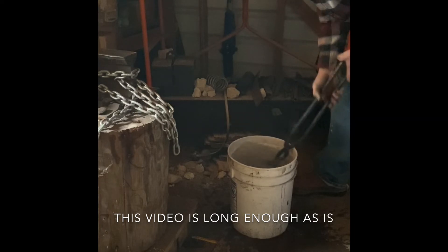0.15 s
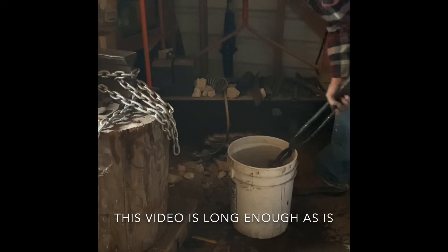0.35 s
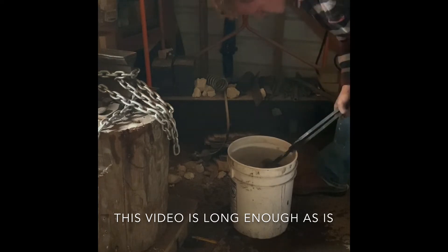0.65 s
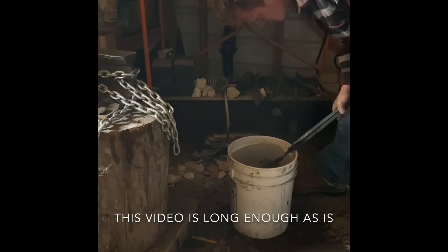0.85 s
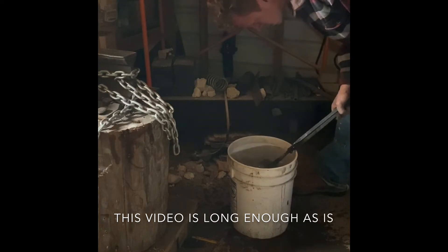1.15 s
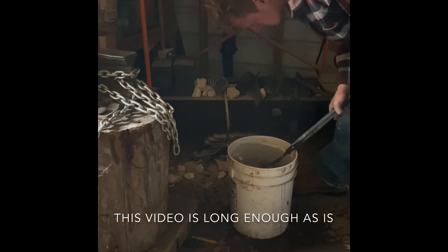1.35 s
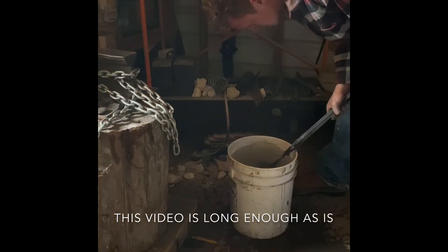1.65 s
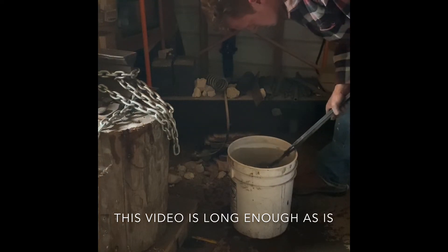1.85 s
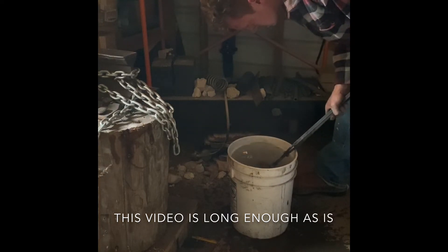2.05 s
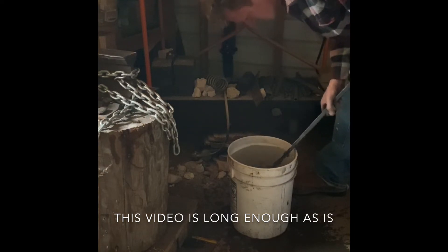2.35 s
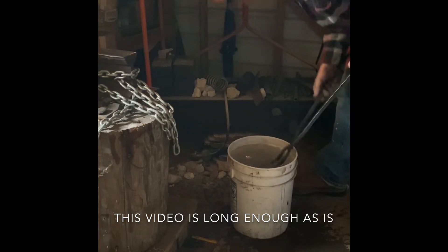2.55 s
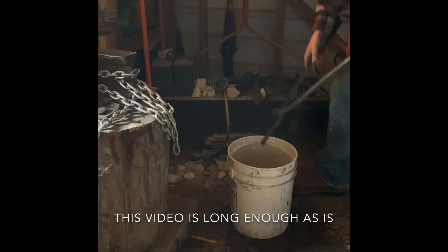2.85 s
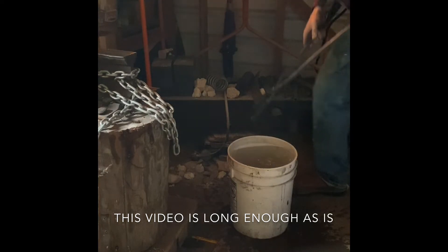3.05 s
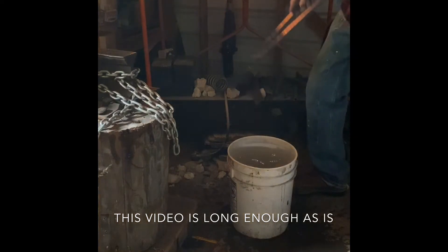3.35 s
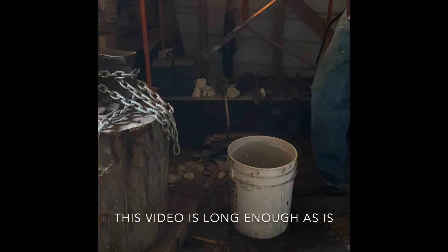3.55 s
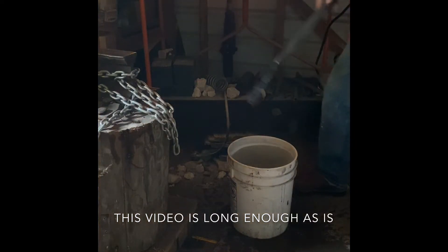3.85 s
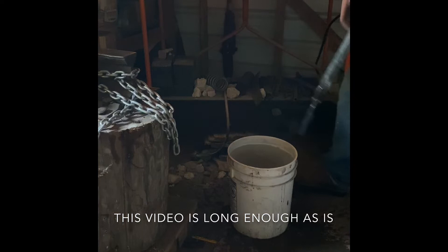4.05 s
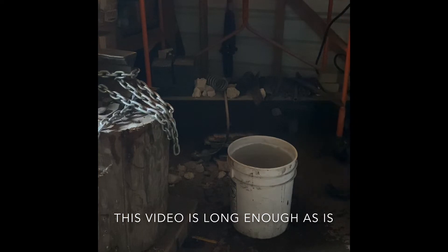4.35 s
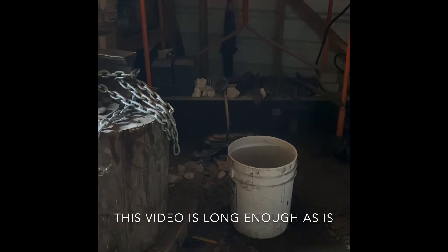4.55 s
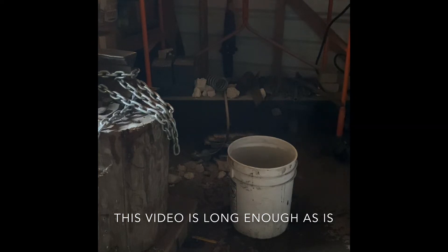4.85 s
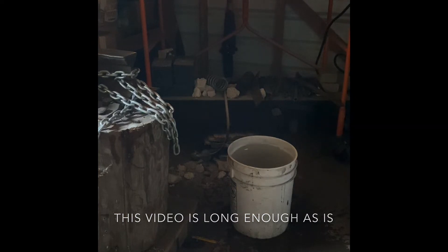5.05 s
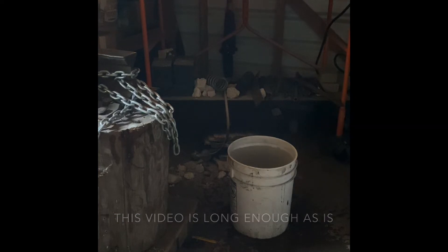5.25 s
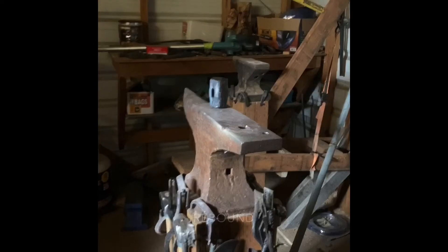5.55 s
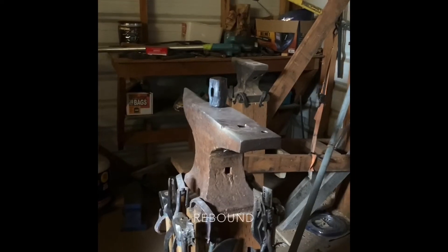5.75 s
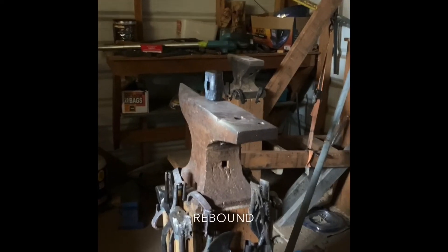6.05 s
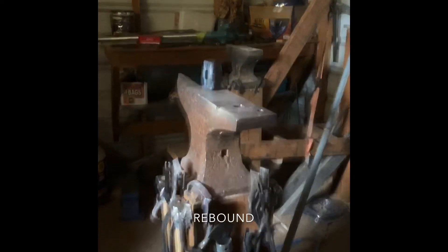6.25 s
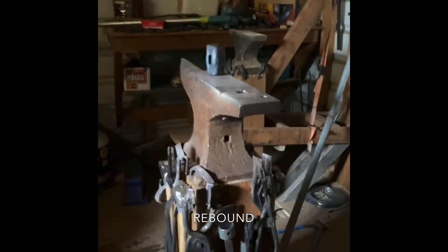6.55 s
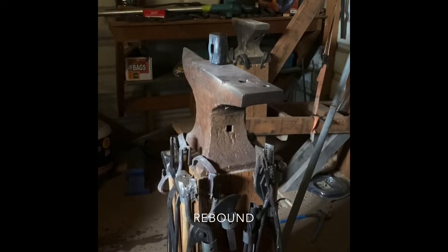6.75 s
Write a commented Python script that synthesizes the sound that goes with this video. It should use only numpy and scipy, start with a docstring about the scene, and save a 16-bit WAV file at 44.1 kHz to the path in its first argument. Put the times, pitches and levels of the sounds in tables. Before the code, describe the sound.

A forge burns with a steady, low, fluttering roar and a thin hiss in a modest, slightly echoing workshop. At about 0.15 s steel lightly taps a water-filled plastic bucket, with a faint dull step. The roar then dominates, with small low bubble blips near 1.35 and 2.4 s and a very faint sizzle around 2.5 s. At 2.65 s comes a loud, boomy bucket knock, followed until 3.2 s by rattles, dull bumps, watery plops, drips and small splashes. A heavy footfall lands at 3.55 s, a drip at 3.6 s, and tongs clink brightly at 3.66 s. A faint step follows at 4.55 s and a low blip at 4.8 s. At 5.44 s the roar stops short. Quiet air and low handling rumble remain, with a bump and scuffs at 5.57 s, a stronger thump at 6.23 s, and ticks, rubs and soft thumps from 6.4 to 6.8 s, very close.

```python
"""In a smithy, a forge roars while steel held in tongs is quenched in a plastic bucket of water.
The steel knocks the bucket, rattles and sloshes as the tongs come out; a footfall and a clink follow.
Then the roar stops short, leaving the quiet shop and soft bumps and scuffs close to the microphone.
Roar, steam, friction and water are shaped noise; the bucket, tongs, floor and case ring as dying modes,
blips are sines of rising pitch; thumps are damped low swings, and walls prolong the distant blows."""
import sys
import numpy as np
from scipy import signal
from scipy.fft import rfft, irfft
from scipy.io import wavfile

SR = 44100
rng = np.random.default_rng(int(sys.argv[2]) if len(sys.argv) > 2 else 0)


def persist_wave(psi):
    """Save psi, clipped to +-1, as 16-bit WAV."""
    counts = np.round(np.clip(psi, -1, 1) * 32767).astype(np.int16)
    wavfile.write(sys.argv[1], SR, np.atleast_2d(counts).T)


N = 303828
TIME, HZ = np.arange(N) / SR, np.fft.rfftfreq(N, 1 / SR)
HIT_SIZE = 32768  # samples in one blow
AGE = np.arange(HIT_SIZE) / SR  # seconds since the blow

# Spectrum of the flame. Each row: frequency in Hz, relative density in dB per Hz.
FORGE_COLOUR = [(20, -31), (50, -2.5), (140, -6), (330, 0), (560, -2), (850, -12.5), (1500, -18),
                (2200, -21), (2800, -16), (3700, -30), (5000, -30), (7500, -43.5), (11500, -33),
                (15000, -43.5)]
# Resonances and hollows of forge and room. Each row: frequency in Hz, width in Hz, lift in dB.
FORGE_PEAKS = [(94.5, 54, -2), (147, 14, 5.5), (226.2, 19, -7), (261.6, 21, 5.5), (331, 29, -3.5),
               (379.3, 22, 7.5), (388.7, 23, 6), (429, 50, -6.5), (646.4, 70, 9.5), (720, 21, 7),
               (754, 18, -2.5), (870, 26, -5), (958, 190, 6), (1045, 23, 3.5), (1200, 120, -3),
               (1190, 36, 2.5), (1337, 33, 6.5), (1633, 44, -9), (1770, 50, 3), (1970, 89, -0.5),
               (2070, 50, 6), (2210, 110, 7), (2420, 63, -2), (2810, 43, 4.5), (3070, 100, -3),
               (4380, 200, -3)]
# Strength of the draught. Each row: time in seconds, change of the roar in dB.
DRAUGHT = [(0, 0), (2.3, -0.35), (4.1, -0.23), (4.55, 0.5), (4.95, 0.8), (5.12, -1), (5.38, -2)]
FORGE_END, FORGE_FADE = 5.44, 0.034  # s: silence is reached, length of the fade before it
ROAR_DB, HISS_DB = -38.5, -61  # levels at normal draught
FLUTTER_DB = 1.19  # rms flutter of the flame
HISS_FOLLOW = 1.7  # dB of hiss for each dB of draught

# Steel striking the bucket. Each row: start in seconds, level in dB, crack in dB, echo in dB,
# middle near 1.2 kHz in dB, clack near 2.2 kHz in dB, boom in dB.
KNOCKS = [(0.1413, -31.5, -22, -7.5, 7, 0, -2.5), (0.1492, -35.5, -13.5, -1, -2, 5, 1),
          (2.6446, -12, -14, -4.5, -2.5, -1.5, 5), (2.6746, -26.5, -17.5, -9, 0, -3.5, 8.5),
          (2.687, -30, -7.5, -5.5, 4.5, -1, -2), (2.7818, -45, -12, -2.5, 1, -1.5, 9),
          (2.824, -26, -15.5, -1.5, -4.5, -5, -3.5), (2.9829, -25.5, -9.5, -5.5, -3, 0, 1.5),
          (3.0927, -25, -13, 0.5, -1, 2, -1)]
# Spectrum of a knock. Each row: frequency in Hz, relative density in dB per Hz.
KNOCK_COLOUR = [(30, -64.5), (90, -38.5), (125, -27), (240, -37.5), (380, -33), (560, -41), (790, -36),
                (1150, -40.5), (1600, -40.5), (2300, -42), (3300, -48), (5200, -39.5), (9500, -53),
                (15000, -64)]
# Decay of the wash: the treble dies first. Each row: frequency in Hz, time constant in seconds.
KNOCK_FALL = [(200, 0.011), (1000, 0.014), (2500, 0.0059), (8000, 0.0012)]
# Modes of the full bucket. Each row: frequency in Hz, relative level in dB, t60 in seconds.
BUCKET_MODES = [(172.6, 3, 0.38), (200.6, 1.5, 0.55), (281, 7, 0.25), (333, 8, 0.23), (477, 2.5, 0.26),
                (660, 4, 0.24), (734, 5.5, 0.27), (950, -7.5, 0.22), (1035, -5.5, 0.31), (1280, -8.5, 0.17),
                (1455, -2.5, 0.17), (1660, -8, 0.2), (1940, -7, 0.12), (2330, 6, 0.03)]
KNOCK_600_DB = 0  # relative level of a knock near 600 Hz
WASH_GRAIN_DB = 1  # lumpiness of the wash after a knock
BUCKET_RING_DB = -13.5  # the ringing of the wall

# Reverberation of the workshop. Each row: frequency in Hz, t60 in seconds.
ROOM = [(60, 1), (150, 0.65), (400, 0.21), (1500, .36), (5000, 0.26), (14000, .2)]
# Colour of the echo as a blow starts. Each row: frequency in Hz, relative echo in dB.
WET = [(100, -5), (700, -1.5), (2000, -9), (4000, -7), (9000, -20.5)]

# Dull thumps of the bucket, the floor and the microphone's case. Each row: start in seconds, level in dB,
# settled pitch in Hz, swell in seconds, left minus right in dB, lead of the left in radians.
THUMPS = [(0.147, -30, 268, 0.0039, -2, 0), (0.159, -25.5, 131, 0.0037, 0.5, 0),
          (2.651, -15, 318.5, 0.0065, -0.5, 0.07), (2.651, -16.5, 118.7, 0.0074, -1.5, 0),
          (2.792, -32, 186, 0.01, 0, -0.12), (2.869, -28.5, 274, 0.0089, 0, -0.13),
          (2.903, -21.5, 122.5, 0.011, -1.5, 0), (2.948, -22.5, 111, 0.005, 0, 0),
          (2.993, -30, 246, 0.011, 0, 0), (3.024, -24.5, 136, 0.0067, 1, 0),
          (3.094, -29, 134, 0.0059, 1.5, 0), (3.135, -27, 143, 0.0058, 1, -0.12),
          (3.167, -22.5, 162, 0.0062, 0.5, 0), (5.576, -25.5, 476, 0.0024, -3, 1),
          (5.574, -23.5, 127.4, 0.002, -1, 0), (6.2241, -21, 255, 0.0019, -14, .3),
          (6.231, -14, 105.5, 0.0044, -0.5, 0.48), (6.458, -22.5, 88, 0.0081, -4.5, -0.26),
          (6.457, -34, 565, 0.0021, 8, -1.3), (6.4644, -29.5, 477, 0.0053, 2, -0.79),
          (6.63, -29.5, 269, 0.0024, -2, -0.46), (6.639, -26.5, 170, 0.012, 0, -0.04),
          (6.696, -24, 157.3, 0.011, -1.5, -0.096), (6.789, -45, 337, 0.004, -4, 0),
          (6.799, -28.5, 165.5, 0.0064, -0.5, -0.036)]
THUMP_SAG = 0.12  # a thump starts this share above its pitch

# Footfalls on the workshop floor. Each row: start in seconds, level in dB.
STEPS = [(0.2, -39.5), (3.562, -25.5), (4.549, -38)]
# Spectrum of a step. Each row: frequency in Hz, relative density in dB per Hz.
STEP_COLOUR = [(30, -47), (80, -31), (125, -22), (190, -25), (300, -30.5), (600, -73.5), (3000, -62),
               (15000, -73)]
# Modes of the floor. Each row: frequency in Hz, level relative to the step in dB, t60 in seconds.
FLOOR_MODES = [(100, -4.5, 0.3), (135, 4, 0.25), (182.5, 0, 0.2), (367, -11.5, 0.081)]

# Short rounded blips, a few low ones amid the roar.
# Each row: start in seconds, level in dB, starting pitch in Hz.
BLIPS = [(1.354, -33, 667), (2.389, -29.5, 626), (2.686, -24.5, 1480), (2.704, -30, 1840),
         (2.786, -45, 1540), (2.860, -33, 2750), (2.862, -24.5, 1457), (2.879, -27, 2090),
         (2.897, -26.5, 2070), (2.9535, -24.5, 2040), (2.955, -37, 1140), (2.984, -24.5, 2000),
         (2.994, -33, 1480), (3.000, -37, 1750), (3.036, -47, 2100), (3.134, -32.5, 1444),
         (3.613, -32, 2240), (4.789, -34, 700)]
BLIP_CYCLES, BLIP_RISE = 10, 0.019  # decay constant in cycles, share by which the pitch climbs
BLIP_ECHO_DB = -3.5  # room level
DRIP_DB, DRIP_SPREAD_DB = -11, 7  # level relative to the splash, its scatter either way
DRIP_LOW_HZ, DRIP_HIGH_HZ = 1120, 2590  # range of starting pitch
DRIP_WINDOW_S = 0.037  # each splash stirs up small bubbles for this long

# Wet steel sizzling as it comes up and is carried off.
# Each row: middle in seconds, relative level in dB, half length in seconds.
SIZZLES = [(2.485, -53, 0.033), (2.97, -54, 0.07)]
SIZZLE_RING_DB, SIZZLE_RING_HZ = 10, 130  # lift and width of the tongs' modes in the hiss

# Water falling off the steel into the bucket.
# Each row: start in seconds, level in dB, decay in seconds, spray in dB.
SPLASHES = [(2.8602, -25, 0.032, -1.5), (2.889, -30, 0.0066, 3), (2.9497, -28.5, 0.025, 3),
            (3.004, -32, .008, -3), (3.065, -39, 0.018, -12), (3.128, -33.5, .014, -5),
            (3.1429, -31.5, 0.016, -2.5), (3.6105, -40.5, 0.0088, 5.5)]
# Spectrum of a splash. Each row: frequency in Hz, relative density in dB per Hz.
SPLASH_COLOUR = [(50, -58), (150, -39.5), (300, -34.5), (500, -46), (750, -37.5), (1100, -47),
                 (1700, -46.5), (2300, -49), (3300, -54.5), (5200, -56.5), (9500, -65.5), (15000, -74.5)]
# Hollow of the bucket above the water. Each row: frequency in Hz, width in Hz, lift in dB.
SPLASH_RINGS = [(631, 50, 6.5), (1120, 50, 10), (1515, 78, 2), (2060, 190, 8.5)]
SPLASH_GRAIN_DB, SPLASH_ECHO_DB = 3, -3.5  # lumpiness of the water, room level

# The jaws meet and bounce. Each row: start in seconds, relative level in dB.
CLINKS = [(3.6604, 0), (3.667, -5.5), (3.674, -9)]
# Spectrum of the clash. Each row: frequency in Hz, density in dB per Hz before the jaws' resonances.
CLINK_COLOUR = [(50, -120), (3500, -84.5), (4700, -80), (6500, -70.5), (9000, -79), (12000, -83),
                (15500, -84.5)]
# Clusters of close modes in the jaws. Each row: frequency in Hz, width in Hz, lift in dB.
CLINK_RINGS = [(4700, 260, 6.5), (5640, 250, -5), (9450, 300, 6.5), (10900, 400, 0)]
# Modes of the tongs. Each row: frequency in Hz, relative level in dB, t60 in seconds.
TONGS_MODES = [(4080, -6.5, 0.18), (4600, -2, 0.11), (4900, -12, 0.14), (5300, -15, 0.17),
               (5760, -11.5, 0.13), (6330, -18.5, 0.2), (8400, -10, 0.15), (9141, -5, 0.11),
               (10800, -0.5, 0.13), (12760, -22, 0.11), (14550, -22.5, 0.11)]

# Handling rumble. Each row: time in seconds, level in dB.
RUMBLE = [(5.45, -47), (5.62, -45), (6.1, -47), (6.3, -50), (6.55, -47), (6.8, -48.5)]
# Spectrum of that rumble. Each row: frequency in Hz, relative density in dB per Hz.
RUMBLE_COLOUR = [(20, -30), (50, 2), (140, 2), (250, -5), (500, -20), (900, -34), (2000, -56),
                 (15000, -100)]
# Spectrum of the air in the quiet shop. Each row: frequency in Hz, relative density in dB per Hz.
SHOP_COLOUR = [(20, -20), (300, 0), (1000, -4), (3000, -12), (8000, -21), (15000, -27)]
RUMBLE_SWAY_DB, SHOP_DB = -0.45, -77  # unevenness of the rumble, level of the air

# Scuffs and ticks beside the microphone. Each row: start in seconds, level in dB, decay in seconds,
# low ring in dB, high ring in dB (rings relative to the level).
SCUFFS = [(5.559, -58, 0.0089, -2, 1), (5.5723, -50, 0.0009, -6, 11.5), (5.5785, -51, 0.0056, -6, -10),
          (5.595, -50.5, 0.0041, 0, -2), (5.606, -52.5, 0.041, -8, -0.5), (6.2219, -48, 0.0013, -14, -20),
          (6.2317, -46, 0.0021, -19, -14), (6.242, -55.5, 0.0016, -16, -12), (6.3265, -64, 0.0034, -8, -11),
          (6.339, -68, .002, -8, -10), (6.375, -77, .003, 14, 10), (6.387, -66, 0.0016, 20, -1),
          (6.401, -68, 0.0018, 8, 3), (6.4205, -53.5, 0.00086, 10, -2), (6.4474, -46, 0.0023, 7.5, 3),
          (6.4522, -42, 0.0036, -18, 8), (6.465, -43, 0.011, -8, 1), (6.473, -47.5, .005, -6, 3),
          (6.627, -54.5, 0.083, -10.5, -12), (6.663, -62, 0.0076, -5, -5), (6.704, -61, 0.021, -4.5, -11)]
# Spectrum of a scuff before the tilt below. Each row: frequency in Hz, relative density in dB per Hz.
SCUFF_COLOUR = [(40, -21), (200, -15), (500, -22.5), (800, -36), (1100, -35), (1500, -49.5), (2000, -51),
                (2700, -44), (4200, -53.5), (8000, -54), (15000, -75)]
# Tilt of every scuff. Each row: frequency in Hz, lift in dB.
SCUFF_TILT = [(2000, -1.8), (8000, 0.5)]
# Low, then high modes of the case. Each row: frequency in Hz, relative level in dB, t60 in seconds.
CASE_LOW = [(1340, 0, 0.018), (1500, -2, 0.024)]
CASE_HIGH = [(2570, 6, 0.012), (2900, -4.5, 0.017)]
# The same case colouring friction noise. Each row: frequency in Hz, width in Hz, lift in dB.
CASE_RINGS = [(1450, 190, 7), (2540, 320, 5)]
SCUFF_RISE_S, SCUFF_ECHO_DB = 0.00067, -26  # time constant of a fingertip's bite, room level

# A hand sliding on the case. Each row: middle in seconds, relative level in dB, half length in seconds.
RUBS = [(6.398, -62, 0.017), (6.456, -56.5, 0.02), (6.545, -72, 0.038), (6.645, -64, 0.034),
        (6.72, -63, 0.027), (6.79, -74.5, 0.043)]
# Spectrum of a rub. Each row: frequency in Hz, relative density in dB per Hz.
RUB_COLOUR = [(100, -26), (500, -8), (900, -4), (1500, -2.5), (2000, 1.5), (2700, -7), (4500, -9),
              (8000, -14.5), (15000, -21)]
RUB_GRAIN_DB = 2.5  # the skin sticks and slips

# Coherence of the two microphone ports. Each row: frequency in Hz, likeness from 0 to 1.
LIKENESS = [(80, 1), (170, 0.99), (380, 0.71), (600, 0.16), (1000, .45), (2000, 0.75), (2700, 0.77),
            (3800, 1), (5500, .8), (7500, 1), (15000, 0.33)]
# Phase between the ports. Each row: frequency in Hz, lead of the left in radians.
LEAD = [(20, 0), (1400, 0), (2200, .4), (4000, 1.2), (4800, .3), (5800, 1.3), (7200, 3.1), (9900, 6.1),
        (11000, 6.5), (13600, 9.4), (16000, 12.2)]
# Further lead for sounds right beside the microphone. Each row: frequency in Hz, lead in radians.
CLOSE_LEAD = [(150, -0.54), (400, 1.2), (900, 2), (1700, 0.96), (2500, -1.6), (4000, 0.22), (5500, 0.071)]
EDGE_HZ = 15950  # upper band limit

# Overlapping triangular bands that share out the spectrum of a blow.
BANDS = np.geomspace(35, 15500, 22)  # centres in Hz
BIN_HZ = np.fft.rfftfreq(HIT_SIZE, 1 / SR)
SPLIT = np.array([np.interp(np.log(BIN_HZ + 1), np.log(BANDS), row) for row in np.eye(len(BANDS))])
BAND_WIDTH = SPLIT.sum(1) * SR / HIT_SIZE  # Hz
LEVEL_SPAN = .02  # s over which the energy of a burst is reckoned


def amp(db):
    """Logarithmic level: decibels to gain."""
    return 10 ** (np.asarray(db) / 20)


def evened(x):
    """Normalisation of power: scales to rms 1."""
    return x / np.sqrt(np.mean(x ** 2, axis=-1, keepdims=True) + 1e-30)


def read(points, hz):
    """Interpolation of a table on a logarithmic frequency axis."""
    f, value = np.transpose(points)
    return np.interp(np.log(hz + 1), np.log(f + 1), value)


def curves(rows):
    """Linear interpolation in time: each column of a time table, at every sample."""
    s, *columns = np.transpose(rows)
    return [np.interp(TIME, s, c) for c in columns]


def add(mix, s, sound):
    """Superposition: adds a sound to the mix at time s."""
    part = mix[:, max(round(s * SR), 0):][:, :sound.shape[-1]]
    part += sound[..., :part.shape[1]]


def noise(gain):
    """Spectral shaping: two unrelated noises of rms 1 with the given spectrum."""
    return evened(irfft(rfft(rng.standard_normal((2, N))) * gain, N))


def below(hz):
    """Low-pass magnitude response, steep, without phase shift."""
    return 1 / np.sqrt(1 + (HZ / hz) ** 10)


def above(hz):
    """Power-complementary high-pass response."""
    return np.sqrt(1 - below(hz) ** 2)


def wander(size, step):
    """Slow random fluctuation: a smooth line of rms 1 that turns about every step points."""
    smoothing = np.exp(-(np.fft.rfftfreq(size) * step) ** 2)
    return evened(irfft(rfft(rng.standard_normal(size)) * smoothing, size))


def swells(rows):
    """Gaussian envelopes: bell-shaped rises and falls of level."""
    return sum(amp(db) * np.exp(-((TIME - s) / half) ** 2) for s, db, half in rows)


def burst(colour_db, envelope):
    """Energy by band: enveloped noise with the energy of colour_db held for LEVEL_SPAN seconds."""
    bands = irfft(rfft(rng.standard_normal((2, 1, HIT_SIZE))) * SPLIT) * envelope
    gain = amp(colour_db) * np.sqrt(BAND_WIDTH * LEVEL_SPAN * SR / HIT_SIZE)
    return (evened(bands) * gain[:, None]).sum(1)


def in_room(late, decay, wet_db):
    """Reverberation by band: a rise of about one cycle, a quick fall, then the workshop's echo."""
    t = np.maximum(AGE - late, 0)
    echo_start = amp(wet_db + read(WET, BANDS)[:, None])
    echo = echo_start * 1e3 ** (-t / read(ROOM, BANDS)[:, None])
    rise = 1 - np.exp(-t * BANDS[:, None])
    return rise * np.hypot(np.exp(-t / decay), echo)


def at_once(hz):
    """Simultaneous onset: no mode waits."""
    return 0


def ring(modes, lag):
    """Modal decay: dying sines, each starting lag(Hz) seconds after the blow, a quarter turn apart."""
    out = np.zeros((2, HIT_SIZE))
    for hz, db, t60 in modes:
        t = np.maximum(AGE - lag(hz), 0)
        turns = hz * t + rng.random() + np.array([[0], [1 / 4]])
        rise = 1 - np.exp(-2 * hz * t)
        out += amp(db - 60 * t / t60) * rise * np.sin(2 * np.pi * turns)
    return out


def resonant(x, peaks):
    """Parallel resonance: peak filters add to or take from the sound."""
    out = x.copy()
    for hz, width, db in peaks:
        b, a = signal.iirpeak(hz, hz / width, fs=SR)
        out += (amp(db) - 1) * signal.lfilter(b, a, x)
    return out


def forge():
    """Turbulent combustion: flame noise through fixed resonances, with a thin hiss of gas on top."""
    peaks_db = sum(db / (1 + (2 * (HZ - hz) / width) ** 4) for hz, width, db in FORGE_PEAKS)
    comb_db = 2.8 * wander(len(HZ), step=280) * above(790)  # fine ripple left by the walls
    colour = amp(read(FORGE_COLOUR, HZ) + peaks_db + comb_db)
    flame = rfft(noise(colour * below(4000)))
    zones = [below(496), above(497) * below(1584), above(1527)]  # each flutters on its own
    roar = sum(amp(FLUTTER_DB * wander(N, step=2200)) * irfft(flame * zone ** 2, N) for zone in zones)
    hiss = noise(colour * above(4000))
    draught_db, = curves(DRAUGHT)
    burning = amp(ROAR_DB + draught_db) * roar + amp(HISS_DB + HISS_FOLLOW * draught_db) * hiss
    return burning * np.clip((FORGE_END - TIME) / FORGE_FADE, 0, 1) ** 2


def wall_lag(hz):
    """Dispersion: bending waves in the bucket wall are slower at low pitch, so the boom trails (s)."""
    return 0.003 * np.maximum(np.sqrt(2400 / np.maximum(hz, 200)) - 1, 0)


def bucket():
    """Impact on a shell: a crack, a lumpy wash that the room prolongs, and the full bucket's boom."""
    out = np.zeros((2, N))
    fall = read(KNOCK_FALL, BANDS)[:, None]
    for s, db, crack_db, echo_db, middle_db, clack_db, boom_db in KNOCKS:
        tilt = [(330, boom_db), (600, KNOCK_600_DB), (1000, middle_db), (1500, middle_db),
                (1950, clack_db), (2300, clack_db), (3400, crack_db)]
        lumps = amp(WASH_GRAIN_DB * np.tanh(AGE / .02) * wander(HIT_SIZE, step=340))
        envelope = lumps * in_room(wall_lag(BANDS)[:, None], fall, echo_db)
        add(out, s, burst(db + read(tilt, BANDS) + read(KNOCK_COLOUR, BANDS), envelope))
        modes = [(hz, mode_db + read(tilt, hz), t60) for hz, mode_db, t60 in BUCKET_MODES]
        add(out, s, amp(db + BUCKET_RING_DB) * ring(modes, lag=wall_lag))
    return out


def thumps():
    """Heavy damping: low swings die quickly and their pitch sags as the contact softens."""
    out, side = np.zeros((2, N)), np.array([[.5], [-.5]])
    for s, db, pitch_hz, swell, pan_db, lead in THUMPS:
        u = AGE / max(swell, 1 / SR)
        hz = pitch_hz * (1 + THUMP_SAG * np.exp(-u))
        phase = 2 * np.pi * np.cumsum(hz) / SR + lead * side
        add(out, s, amp(db + pan_db * side) * u * np.exp(1 - u) * np.sin(phase))
    return out


def footfalls():
    """Impact on a floor: heavy, dull steps set its modes swinging and boom in the room."""
    out = np.zeros((2, N))
    for s, db in STEPS:
        add(out, s, burst(db + read(STEP_COLOUR, BANDS), in_room(0, decay=0.088, wet_db=-11.5)))
        add(out, s, amp(db) * ring(FLOOR_MODES, lag=at_once))
    return out


def drips(count):
    """Air entrainment: small bubbles follow each splash, stronger after a big one, as rows of blips."""
    rows = []
    for s, db, *_ in SPLASHES:
        for when, strength, pitch in rng.random((count, 3)):
            drip_db = db + DRIP_DB + DRIP_SPREAD_DB * (2 * strength - 1)
            hz = DRIP_LOW_HZ * (DRIP_HIGH_HZ / DRIP_LOW_HZ) ** pitch
            rows.append((s + DRIP_WINDOW_S * when, drip_db, hz))
    return rows


def blips():
    """Damped oscillation: each blip is a dying sine that rises a little in pitch and echoes in the room."""
    direct = np.zeros((2, N))
    for s, db, hz in BLIPS + drips(count=3):
        cycles = hz * AGE
        climb = 1 + BLIP_RISE * np.tanh(cycles / 30)
        turns = cycles * climb + rng.random() + np.array([[0], [1 / 4]])
        envelope = (1 - np.exp(-cycles)) * np.exp(-cycles / BLIP_CYCLES)
        add(direct, s, amp(db) * envelope * np.sin(2 * np.pi * turns))
    tail = rng.standard_normal((2, HIT_SIZE)) * amp(-60 * AGE / read(ROOM, 1800))
    tail /= np.linalg.norm(tail[0])
    return direct + amp(BLIP_ECHO_DB) * signal.fftconvolve(direct, tail, axes=1)[:, :N]


def sizzle():
    """Boiling noise: brief faint hisses of steam, coloured by the tongs that slide on the steel."""
    lift_db = SIZZLE_RING_DB * sum(1 / (1 + (2 * (HZ - hz) / SIZZLE_RING_HZ) ** 2)
                                   for hz, *_ in TONGS_MODES)
    band = above(3800) * below(9000) / np.sqrt(1 + (HZ / 5500) ** 2)
    return swells(SIZZLES) * noise(amp(lift_db) * band)


def splashes():
    """Cavity resonance: lumps of water slap the surface with a little spray and ring the hollow above."""
    out = np.zeros((2, N))
    for s, db, decay, spray_db in SPLASHES:
        colour_db = db + read(SPLASH_COLOUR, BANDS) + read([(2300, 0.0041), (3400, spray_db)], BANDS)
        lumps = amp(SPLASH_GRAIN_DB * wander(HIT_SIZE, step=130))
        add(out, s, burst(colour_db, lumps * in_room(0, decay, SPLASH_ECHO_DB)))
    return resonant(out, SPLASH_RINGS)


def tongs():
    """Modes of struck bars: the jaws snap shut with a short, bright, bouncing clink."""
    clash, tone = np.zeros((2, 2, N))
    for s, db in CLINKS:
        add(clash, s, burst(db - 2.0 + read(CLINK_COLOUR, BANDS), in_room(0, decay=0.0036, wet_db=5)))
        add(tone, s, amp(db - 45) * ring(TONGS_MODES, lag=at_once))
    return resonant(clash, CLINK_RINGS) + tone


def quiet_shop():
    """Background noise: handling rumble over the shop's steady air, let in once the forge is gone."""
    rumble_db = curves(RUMBLE)[0] + RUMBLE_SWAY_DB * wander(N, step=3200)
    rumble = amp(rumble_db) * noise(amp(read(RUMBLE_COLOUR, HZ)))
    air = amp(SHOP_DB) * noise(amp(read(SHOP_COLOUR, HZ)))
    return (rumble + air) * np.clip((TIME - FORGE_END) / 0.018, 0, 1)


def scuffs():
    """Dry friction: short rubs ring the microphone's case, too close to stir much echo."""
    friction, tone = np.zeros((2, 2, N))
    colour_db = read(SCUFF_COLOUR, BANDS) + read(SCUFF_TILT, BANDS)
    bite = 1 - np.exp(-AGE / SCUFF_RISE_S)
    for s, db, decay, low_db, high_db in SCUFFS:
        add(friction, s, burst(db + colour_db, bite * in_room(0, decay, SCUFF_ECHO_DB)))
        add(tone, s, amp(db + low_db) * ring(CASE_LOW, lag=at_once))
        add(tone, s, amp(db + high_db) * ring(CASE_HIGH, lag=at_once))
    return resonant(friction, CASE_RINGS) + tone


def rubs():
    """Stick-slip friction: soft swells of uneven noise through the microphone's case."""
    grain = amp(RUB_GRAIN_DB * wander(N, step=280) - 1.0)
    friction = swells(RUBS) * grain * noise(amp(read(RUB_COLOUR, HZ)))
    return resonant(friction, CASE_RINGS)


def ports(pair, more_lead=0):
    """Partial coherence: two unrelated views become ports partly alike, phased by LEAD."""
    a, b = rfft(pair)
    same = np.clip(read(LIKENESS, HZ), -1, 1)
    lag = np.exp(-1j * (read(LEAD, HZ) + more_lead))
    right = (same * a + np.sqrt(1 - same ** 2) * b) * lag
    return irfft(np.array([a, right]), N)


def scene():
    """Superposition of all sources at the microphone; the thumps carry their own balance."""
    far = ports(forge() + bucket() + footfalls() + blips() + sizzle() + splashes() + tongs())
    close = ports(quiet_shop() + scuffs() + rubs(), read(CLOSE_LEAD, HZ))
    return (far + close) * amp([[-.3], [.3]]) + thumps()


def record(dry):
    """Band limitation: a low cut at 32 Hz and a steep upper edge."""
    low_cut = signal.butter(2, 32, "high", fs=SR, output="sos")
    thinned = signal.sosfilt(low_cut, dry)
    edge = signal.firwin(511, EDGE_HZ, window=("kaiser", 9), fs=SR)
    return signal.oaconvolve(thinned, edge[None], "same")


dry = scene()
out = record(dry)
persist_wave(out)
```